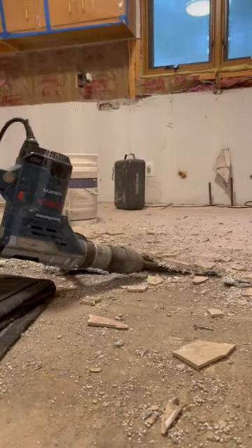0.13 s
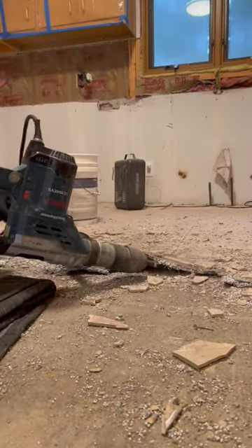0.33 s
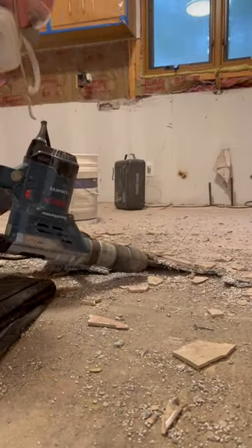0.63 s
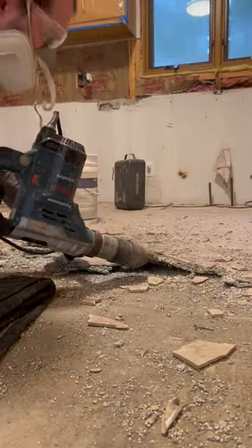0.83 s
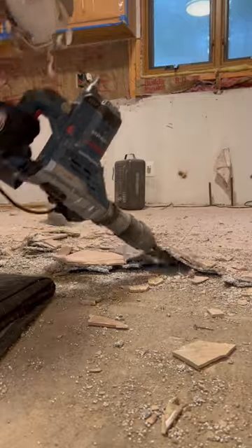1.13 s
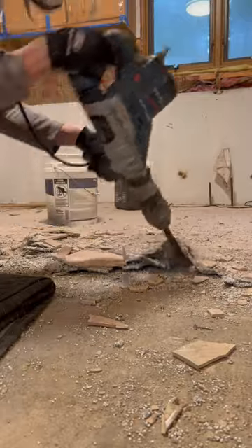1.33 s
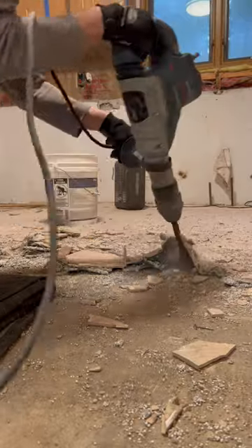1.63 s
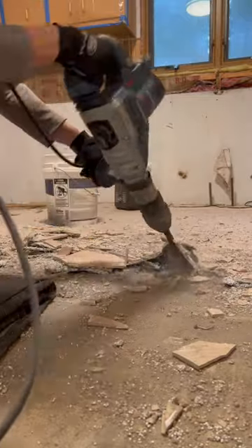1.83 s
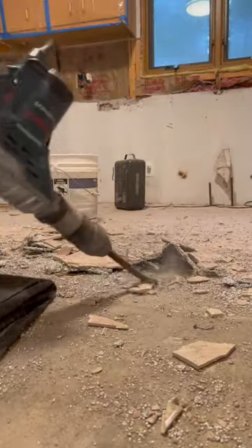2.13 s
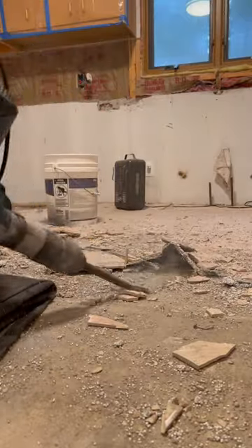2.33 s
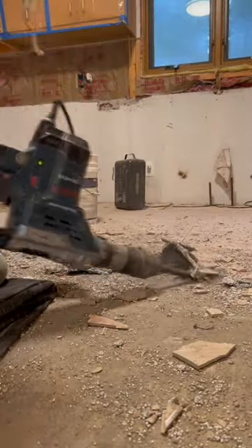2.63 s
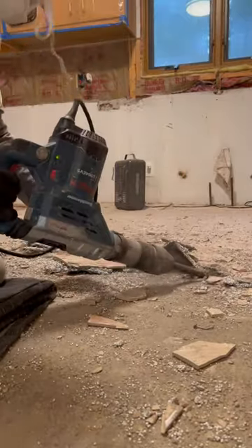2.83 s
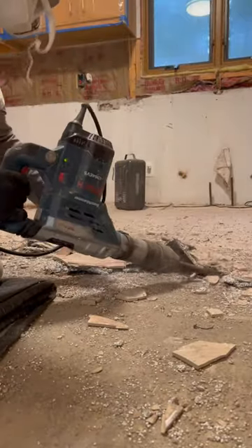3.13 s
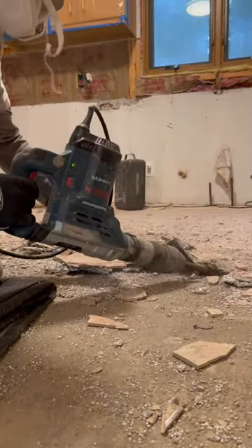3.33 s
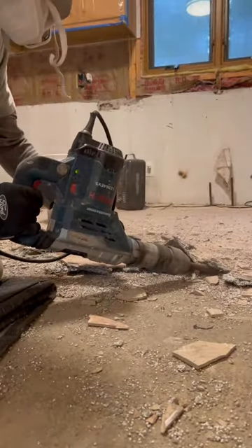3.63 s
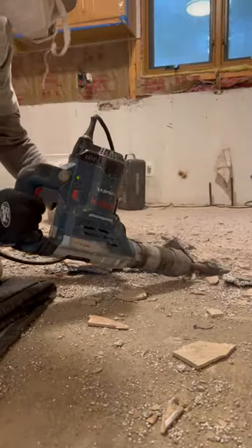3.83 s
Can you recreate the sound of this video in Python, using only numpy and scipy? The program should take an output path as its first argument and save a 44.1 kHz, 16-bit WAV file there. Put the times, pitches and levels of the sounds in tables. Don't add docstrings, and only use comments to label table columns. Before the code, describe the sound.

Close up, a power chisel hammers tile at about 47 blows a second in bursts, with ringing steel, cracking tile and slab thuds; fan hiss, gear whine and shifting shards fill the gaps. Bare room with short echo.

```python
import sys
import numpy as np
from scipy import signal
from scipy.fft import rfft, irfft
from scipy.io import wavfile
from scipy.ndimage import uniform_filter1d

SR = 44100
rng = np.random.default_rng(int(sys.argv[2]) if len(sys.argv) > 2 else 0)


def transcribe(signal):
    frames = np.atleast_2d(signal).T
    limited = np.clip(frames, -1, 1)
    pcm = np.round(limited * 32767).astype(np.int16)
    wavfile.write(sys.argv[1], SR, pcm)


def attenuation_scalar(level_db):
    decades = np.asarray(level_db, float) / 20
    return 10 ** decades


N = 176400
T = np.arange(N) / SR
PERIOD = 1 / 47


def evened(x):
    return x / np.sqrt(np.mean(x ** 2) + 1e-20)


def read(points, hz):
    f, value = np.transpose(points)
    return np.interp(np.log(hz + 1), np.log(f + 1), value)


def colour(x, points):
    gain = attenuation_scalar(read(points, np.fft.rfftfreq(x.shape[-1], 1 / SR)))
    return evened(irfft(rfft(x) * gain, x.shape[-1]))


def modes(x, table):
    out = 0
    for hz, width, db in table:
        r = np.exp(-np.pi * width / SR)
        poles = [1, -2 * r * np.cos(2 * np.pi * hz / SR), r * r]
        out = out + attenuation_scalar(db) * (1 - r) * signal.lfilter([1, 0, -1], poles, x)
    return out


def puff(age, length):
    u = np.maximum(age, 0) / length
    return (u * np.exp(1 - u)) ** 2


def bell(age, length):
    return np.exp(-(age / length - 1.6) ** 2) * (age >= 0)


def spread(x, cycles):
    hz = np.clip(np.fft.rfftfreq(N, 1 / SR), 70, 3000)
    return irfft(rfft(x) * np.exp(-2j * np.pi * cycles * np.log(hz / 3000)), N)


def room(x):
    # Hz, decay time to -60 dB in seconds
    decay = [(100, 0.56), (1000, 0.65), (4000, 0.52), (9000, 0.6)]
    # Hz, level in dB
    wall_tone = [(100, -12.5), (500, -4), (1400, -4.5), (4000, -3), (8400, -3.5)]
    taps = np.zeros((2, SR // 2))
    at = np.arange(200, SR // 2 - 20, 20)
    at = at + rng.integers(0, 20, (2, len(at)))
    np.put_along_axis(taps, at, rng.choice([-1., 1.], at.shape), 1)
    hz, t, z = signal.stft(taps, SR, nperseg=256)
    z[1] = z[0] + (z[1] - z[0]) * np.clip(hz / 900, .1, 1)[:, None]
    z *= attenuation_scalar(read(wall_tone, hz))[:, None]
    tail = signal.istft(z * attenuation_scalar(-60 * t / read(decay, hz)[:, None]), SR, nperseg=256)[1]
    return signal.fftconvolve(x[None], tail / np.linalg.norm(tail[0]), axes=1)[:, :N]


def crank():
    # time in seconds, turns
    counted = [(.0091, 0), (.2408, 11), (.3042, 14), (.3687, 17), (.4535, 21), (1.5521, 75), (1.5727, 76),
               (1.6543, 80), (1.6752, 81), (1.7846, 86), (1.8722, 90), (1.917, 92), (1.963, 94),
               (2.6608, 128), (2.7034, 130), (2.747, 132), (2.8083, 135), (2.8724, 138), (2.9387, 141),
               (3.1329, 150), (3.3246, 159), (3.4098, 163), (3.5155, 168), (3.601, 172), (3.7045, 177),
               (3.8646, 185), (3.9071, 187), (3.9516, 189)]
    s, turns = np.transpose(counted)
    before = turns[0] - (1 + s[0]) * 47.5
    after = turns[-1] + (5 - s[-1]) * 46
    return np.interp(T, np.r_[-1, s, 5], np.r_[before, turns, after])


def fan():
    # Hz, density in dB per Hz
    air = [(60, -29), (300, -23), (1000, -17), (1500, -9), (5000, -11), (10300, -11), (11400, -22),
           (16000, -26.5)]
    # Hz, width in Hz, level in dB
    casing = [(1620, 420, -1.5), (2780, 1430, 2.5), (5965, 420, 10)]
    # Hz, share in common from 0 to 1
    likeness = [(60, 0.85), (950, 1), (15000, 0.39)]
    a, b, gusts = rng.standard_normal((3, N))
    same = np.clip(read(likeness, np.fft.rfftfreq(N, 1 / SR)), 0, 1)
    other = same * rfft(a) + np.sqrt(1 - same ** 2) * rfft(b)
    wind = irfft(np.array([rfft(a), other]), N)
    hiss = attenuation_scalar(-35.5) * colour(wind, air) + attenuation_scalar(-41) * evened(modes(wind, casing))
    throb = 1 + 0.011 * np.cos(4 * np.pi * crank())
    return hiss * throb * attenuation_scalar(1.1 * evened(uniform_filter1d(gusts, 900)))


def gears():
    # time in seconds, pitch in Hz, level in dB
    mesh = [(0, 2060, -46), (0.44, 2084, -49.5), (.47, 2112, -40), (0.559, 2131, -46), (.75, 2094, -41),
            (1.0, 2058, -39), (1.25, 2040, -45), (1.55, 2050, -45.5), (1.851, 1997, -69),
            (2.079, 2124, -42), (2.252, 2101, -45.5), (2.651, 2055, -41), (2.75, 2047, -38),
            (2.899, 1955, -35.5), (3.28, 2042, -33.5), (3.36, 2022, -44.5), (4, 2056, -39.5)]
    # ratio to the mesh pitch, level in dB
    orders = [(0.1439, -21), (1.047, -10.5), (2.43, -7.5)]
    # time in seconds, level in dB
    sideband = [(0, 0.5), (.85, -10.5), (1.08, 2.5), (1.25, -10), (2.35, -12), (2.56, 1), (2.7, -3),
                (4, -2.5)]
    s, hz, db = np.transpose(mesh)
    hz, db = np.interp(T, s, hz), np.interp(T, s, db)
    wobble, fuzz = rng.standard_normal((2, N))
    turns = np.cumsum(hz * (1 + 0.00257 * evened(uniform_filter1d(wobble, 500)))) / SR
    partials = [(1, 0), (.952, np.interp(T, *np.transpose(sideband)))] + orders
    lines = sum(attenuation_scalar(d) * np.sin(2 * np.pi * k * turns) for k, d in partials)
    fuzz = evened(uniform_filter1d(uniform_filter1d(fuzz, size=150), size=150))
    return np.sqrt(2) * attenuation_scalar(db) * lines * (1 + .3 * fuzz)


def scrape():
    # time in seconds, band centre in Hz, level in dB
    slide = [(1.08, 1885, -59), (1.15, 1766, -40), (1.25, 1550, -37.5), (1.399, 1410, -52),
             (1.5, 1425, -52), (2.0, 1400, -58), (2.12, 1428, -41.5), (2.35, 1566, -46), (2.569, 1870, -36),
             (2.68, 2020, -54)]
    s, hz, db = np.transpose(slide)
    rasp = uniform_filter1d(rng.standard_normal((4, N)), size=120)
    turn = 2 * np.pi * np.cumsum(np.interp(T, s, hz)) / SR
    band = rasp[0] * np.cos(turn) + rasp[1] * np.sin(turn)
    octave = rasp[2] * np.cos(2 * turn) + rasp[3] * np.sin(2 * turn)
    level = attenuation_scalar(np.interp(T, s, db, -99, -99))
    return level * evened(band + attenuation_scalar(2.5) * (T > 1.8) * octave)


def pry():
    # time in seconds, level in dB
    effort = [
        (1.08, -44),
        (1.18, -44.5),
        (1.3, -38.5),
        (1.45, -44.5),
        (1.56, -50),
        (1.6, -80),
    ]
    # Hz, level in dB
    grind_tone = [(25, 1), (47, -7), (90, -13), (300, -16), (1000, -23), (3000, -114.5)]
    s, db = np.transpose(effort)
    lumps = attenuation_scalar(2.3 * evened(uniform_filter1d(rng.standard_normal(N), 1500)))
    level = attenuation_scalar(np.interp(T, s, db, -99, -99)) + attenuation_scalar(-61)
    return level * lumps * colour(rng.standard_normal(N), grind_tone)


def shards():
    # start in seconds, peak in dB, pitch in Hz
    drops = [(1.099, -24, 930), (1.149, -32.5, 300), (1.284, -17.5, 950), (1.373, -27, 520),
             (1.412, -28, 1500), (2.457, -13, 7620), (1.664, -18.5, 147), (1.967, -31, 120),
             (3.185, -16.5, 110), (3.331, -10, 233), (.455, -31, 297)]
    out = np.zeros(N)
    for s, db, hz in drops:
        knock = puff(T - s, .5 / hz + 0.0014) * rng.standard_normal(N)
        hit = modes(knock, [(hz, 120, 0), (hz * 1.64, 200, -3), (hz * 1.205, 100, -5)])
        out += attenuation_scalar(db) * hit / abs(hit).max()
    return out


def tile_snap():
    # start in seconds, peak in dB, spreading in cycles
    break_free = (1.6553, -3.5, 1.19)
    s, db, cycles = break_free
    click = 1. * (np.arange(N) == int(s * SR))
    tone = [(60, 7), (300, 9.5), (2000, -5), (6500, -16), (16000, -42)]  # (Hz, dB)
    snap = spread(colour(click, tone), cycles)
    return attenuation_scalar(db) * snap / abs(snap).max()


def chisel_ring(force, first, on, contact, touch, noise, shank_db, bend_db):
    # Hz, width in Hz, level in dB
    steel_modes = [(3780, 120, -41), (4188, 104, -5), (4507, 310, 1), (7260, 270, -1.5), (7943, 320, 5),
                   (8326, 165, 6), (8626, 51, 4.5), (9650, 200, -43), (10200, 140, -24), (15860, 1500, -9)]
    steel = []
    for hz, width, db in steel_modes:
        grip_db = bend_db * (6500 < hz < 7500) + shank_db * (hz < 5200)
        steel.append((hz, width, db + grip_db))
    t = T[:400]
    chatter = bell(t, .00085) * (np.sin(2 * np.pi * 8400 * t) + 0.68 * noise[:400])
    clean = signal.oaconvolve(first * on, chatter)[:N]
    bright = evened(np.gradient(np.gradient(noise)))
    rough = on * (contact * noise + touch * bright)
    drive = 0.35 * evened(clean) + 0.65 * evened(rough)
    return attenuation_scalar(1.5) * modes(force * drive, steel) / np.std(modes(drive, steel))


def tip_crack(force, on, age, back, noise):
    # Hz, level in dB
    crack_tone = [(200, -8), (700, -5), (1800, -1.5), (4000, -1), (9500, -8), (11500, -31), (16000, -20)]
    return force * evened(on * (bell(age, .0006) + 0.31 * back) * colour(noise, crack_tone))


def floor_thud(force, first, on, blow, shake, noise, drives, cycles, loose_db):
    # Hz, width in Hz
    slab = [(47, 30), (141, 28), (205, 60), (275, 45), (420, 100), (565, 140), (740, 200), (970, 160),
            (1180, 160), (2050, 400)]
    floor = [(hz, width, db) for (hz, width), db in zip(slab, drives)]
    blows = first * on
    second = np.roll(blows, int(.4 * PERIOD * SR))
    thud = evened(blows - attenuation_scalar(-12 + loose_db) * second)
    wander = uniform_filter1d(rng.standard_normal((2, 900)), size=24)
    judder = puff(T[:900], 0.0051) * np.gradient(wander, axis=1)
    rock = 0
    for lean, way in zip((np.cos, np.sin), judder):
        rock = rock + signal.oaconvolve(blows * lean(.22 * blow), way)[:N]
    grit = evened(on * (shake + 0.72) * np.gradient(uniform_filter1d(noise, size=16)))
    drive = thud + attenuation_scalar(-5.5 + loose_db) * evened(rock) + attenuation_scalar(-16) * grit
    boom = modes(force * np.roll(drive, 30), floor)
    return spread(boom, cycles) / np.std(modes(drive, floor))


def hammer():
    # time in seconds, blow force in dB, share into the floor in dB
    bursts = [
        [(0, -25, -9.5), (.24, -25.5, -11.5), (.38, -27, -10), (.47, -27, -14)],
        [(1.55, -44, 5.5), (1.575, -20.5, -5.5), (1.635, -20, -2), (1.66, -26, -3.5)],
        [(1.67, -30, -8), (1.7, -24, -9.5), (1.8, -25.5, -7.5), (1.88, -28.5, -4), (1.97, -31.5, -24)],
        [(2.66, -32.5, -10.5), (2.684, -21, -16), (2.72, -26.5, -6.5), (2.79, -21.5, -5.5), (2.84, -17, -8.5)],
        [(2.852, -19.5, -4), (2.95, -18.5, -3.5), (3.03, -20, -0.5)],
        [(3.046, -17.5, -4), (3.2, -18, -5.5), (3.32, -21.5, -5), (3.37, -56.5, 18)],
        [(3.41, -19, -11), (3.44, -18.5, -9), (3.52, -20, -6.5), (3.59, -21, -7.5), (3.645, -42, 2.5)],
        [(3.7, -29.5, -4), (3.76, -20, -11), (3.85, -20.5, -7)],
        [(3.864, -19.5, -6), (3.92, -22, -5), (3.96, -23.5, -4)],
    ]
    slab_drives = [(-19, 5, 2, 4.5, -0.5, 1, 1.5, -8, 4, -3.5),
                   (-11, 18, 12, 4, 7.5, -2, -19, -29, -24, -7),
                   (-19, 10.3, -3, 3.5, -0.5, -4.5, -3, -17, -13, -1),
                   (2, 12.6, 8.5, 5.5, 9, 1.5, -20, -28, -30, 0),
                   (-4, 16.2, 4, 16.5, 10, -3, -5, -3, -12, -18),
                   (-9, 16.6, 4.5, 14.5, 3.5, 9.5, -9, -14, -18, -21),
                   (-26, 5, 0.5, -11, -13, 7.5, -0.5, -12.5, -17, 5),
                   (-28, 7.1, 2, -12, 8, 0, -6, -3, -8, -20),
                   (-36, 9.5, -0.5, -12.5, 6, 1, -6.5, -8, -16, -12)]
    # shank modes near 4.5 kHz in dB, bending mode near 7 kHz in dB
    grips = [(7.5, -5), (8, 10.5), (12.5, 6.5), (8, 13.5), (4.5, 3.5), (8, 3.5), (0, 7.5), (-0.5, 11.5),
             (-5, 4.5)]
    # crack in dB, rebound in dB, rebound place in turns,
    # slab spreading in cycles, tile looseness in dB
    bites = [(-15, -0.5, 0.43, 0.95, -5), (-9.5, -23.5, 0.65, 1.47, -16), (-9, -8, 0.46, 1.095, -8),
             (-16, -18, .55, 0.954, 0), (-12, -9.5, 0.69, 0.662, -2), (-10.5, -29, 0.47, 0.61, -1.5),
             (-9, -14, 0.71, .8, -6), (-10, -22, 0.93, 0.826, 0.5), (-4, -24, 0.96, .8, -6.5)]
    turns = crank()
    blow = np.floor(turns).astype(int) + 1
    first = np.r_[False, np.diff(blow) > 0]
    start = np.maximum.accumulate(np.where(first, T, -.011))
    age = T - start
    luck = rng.standard_normal((200, 4))[blow].T
    noise = rng.standard_normal((3, N))
    contact = bell(age, .00085)
    closing = attenuation_scalar(-5) * np.exp(-(1 - turns % 1) * PERIOD / 0.0022)
    out = np.zeros(N)
    for rows, drives, grip, bite in zip(bursts, slab_drives, grips, bites):
        crack_db, rebound_db, rebound_at, cycles, loose_db = bite
        s, force_db, down_db = np.transpose(rows)
        on = (start > s[0] - .012) & (start < s[-1])
        force = on * attenuation_scalar(np.interp(start, s, force_db) + 0.3 * luck[0])
        down = attenuation_scalar(np.interp(start, s, down_db))
        rebound_age = age - PERIOD * (rebound_at + 0.035 * luck[2])
        back = attenuation_scalar(rebound_db + luck[1]) * puff(rebound_age, .0016) + closing
        touch = back + attenuation_scalar(-37.5)
        ring = chisel_ring(force, first, on, contact, touch, noise[0], *grip)
        crack = attenuation_scalar(crack_db) * tip_crack(force, on, age, back, noise[1])
        thud = floor_thud(force * down, first, on, blow, contact + touch, noise[2], drives, cycles, loose_db)
        out += np.sqrt(np.mean(on) + 1e-9) * (ring + crack + thud)
    return out


def scene():
    # Hz, phase in radians
    port_lead = [(0, 0.68), (8010, -0.72), (9040, -1.02), (11700, -1.86), (16100, -0.62)]
    # Hz, difference in dB
    port_tilt = [(60, -0.3), (200, -.5), (600, -2.6), (2380, -0.5), (15000, 0.26)]
    lines = gears()
    near = hammer() + shards() + tile_snap() + scrape() + pry()
    mix = near + lines + attenuation_scalar(-2.5) * room(near + 0.075 * lines) + fan()
    hz = np.fft.rfftfreq(N, 1 / SR)
    half = attenuation_scalar(read(port_tilt, hz) / 2) * np.exp(.5j * read(port_lead, hz))
    return irfft(rfft(mix) * np.array([half, 1 / half]), N)


def roll_off(x):
    return signal.sosfilt(signal.butter(12, 16500, fs=SR, output="sos"), x)


def record(dry):
    # Hz, level in dB
    mic = [(25, -19), (45, 2.5), (15700, -2), (16100, -49)]
    # start in seconds, end in seconds
    narrow_spells = [
        (-1, .437),
        (1.668, 1.955),
        (3.345, 3.40),
    ]
    hz = np.fft.rfftfreq(N, 1 / SR)
    f, t, z = signal.stft(np.tanh(dry), SR, nperseg=1024)
    f = f[:, None]
    patches = uniform_filter1d(rng.standard_normal(z.shape[1:]), size=20, axis=0)
    patches = evened(uniform_filter1d(patches, size=4, axis=1))
    patches = patches - np.exp(-((f - 12300) / 900) ** 2)
    z *= (patches > np.quantile(patches, .38)) | (f < 10900)
    z = rfft(signal.istft(z, SR, nperseg=1024)[1][:, :N]) * attenuation_scalar(read(mic, hz))
    dip = attenuation_scalar(-4.5 * ((hz > 5100) & (hz < 7000)))
    narrow = irfft(z * (hz < 8830) * dip, N)
    share = sum(1. * ((T > a) & (T < b)) for a, b in narrow_spells)
    share = uniform_filter1d(share, size=200)
    return roll_off(share * narrow + (1 - share) * irfft(z, N))


dry = scene()
out = record(dry)
transcribe(out)
```